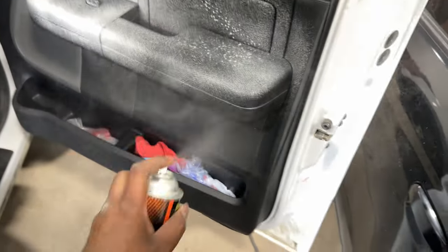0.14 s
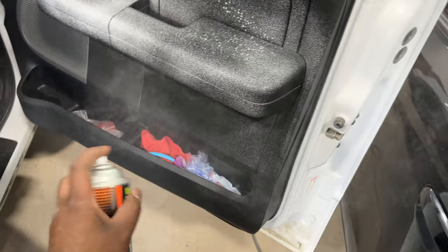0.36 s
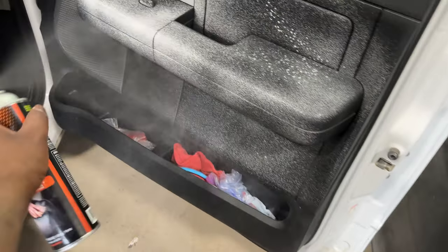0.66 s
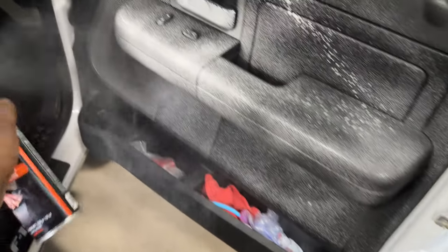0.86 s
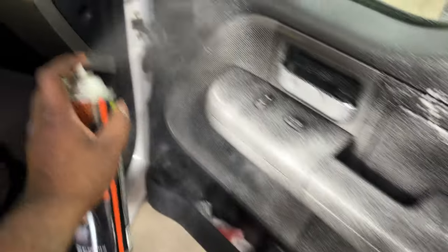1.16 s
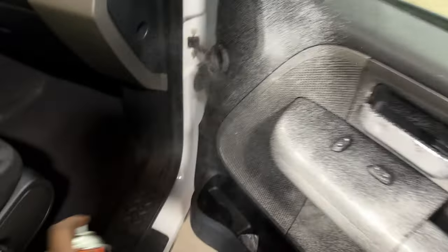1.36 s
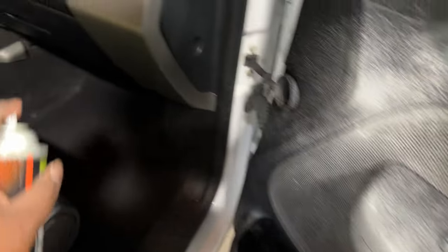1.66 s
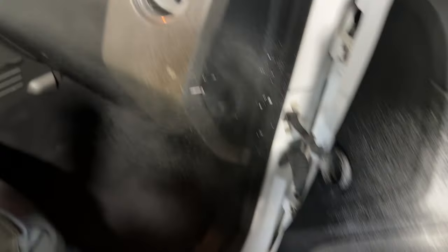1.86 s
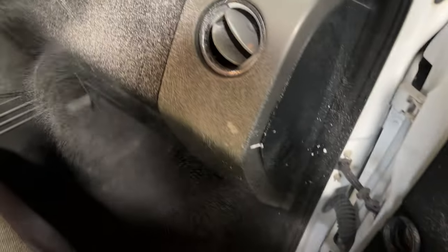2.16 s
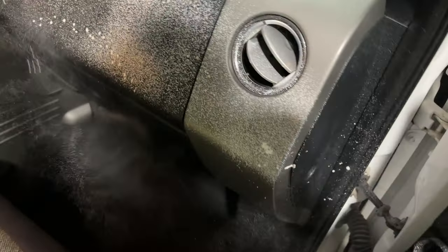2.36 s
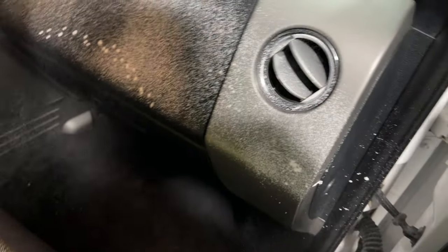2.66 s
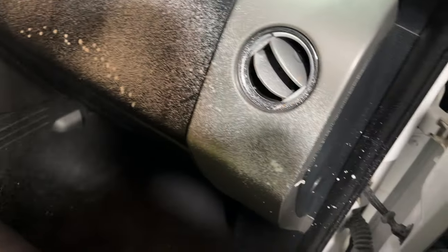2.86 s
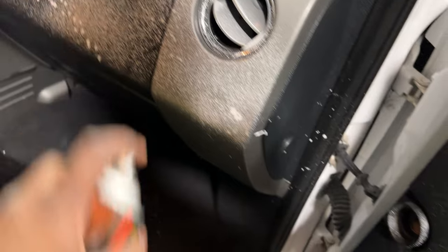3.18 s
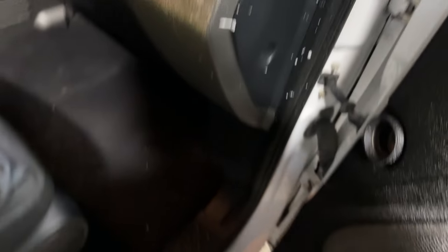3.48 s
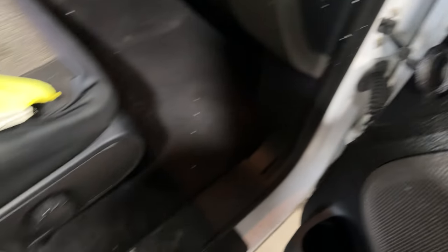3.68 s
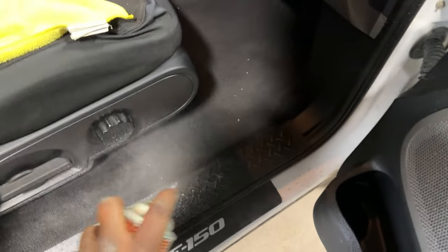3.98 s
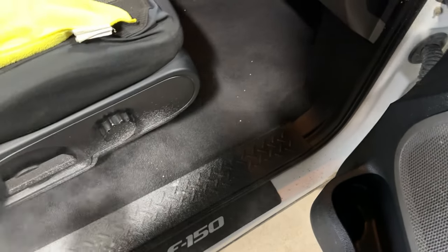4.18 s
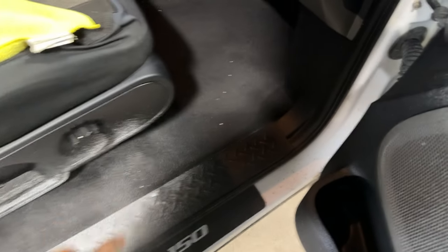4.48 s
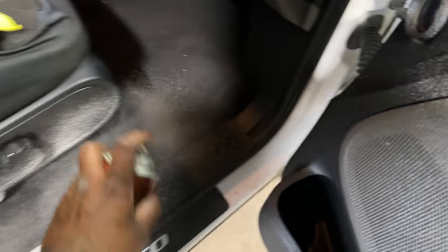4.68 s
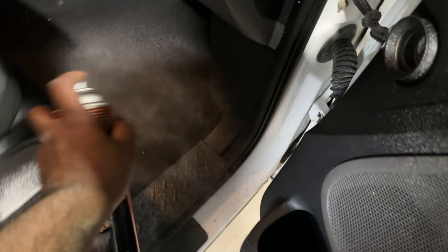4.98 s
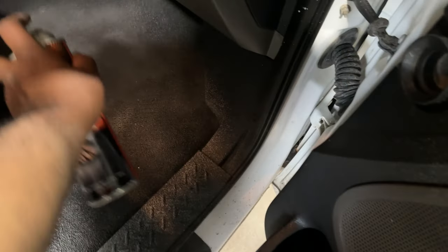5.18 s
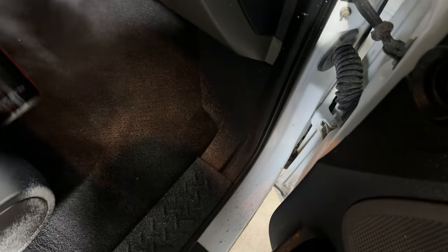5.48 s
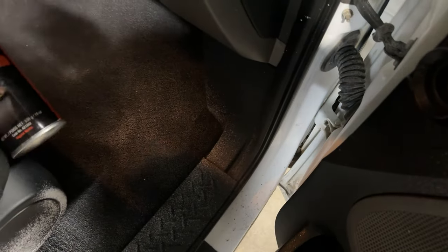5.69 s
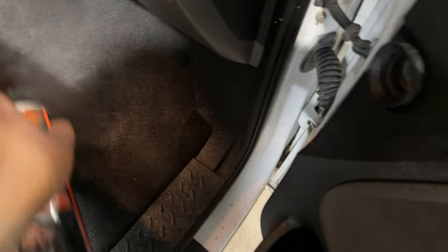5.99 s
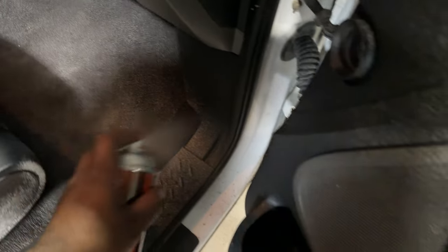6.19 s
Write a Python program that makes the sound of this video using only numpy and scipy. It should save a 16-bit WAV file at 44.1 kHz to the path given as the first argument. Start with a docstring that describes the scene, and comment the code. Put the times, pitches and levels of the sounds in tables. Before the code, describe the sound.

An aerosol can sprays foam over a vehicle's door, dash and carpet in several short, bright hisses, then one long continuous press. Brief coarser roars flare between bursts, with spits, leaks and fizz around the valve. Soft bumps and low rumble come from the hand-held microphone, very close. Late in the long spray, something hard knocks the trim with a boomy thud and small clatter. The quiet garage adds only a faint tail.

```python
"""Hissing bursts of foam cleaner open the scene amid soft bumps of a hand-held camera, close to a truck's cab.
The jet is banded turbulent noise, gated by each press; it roars briefly at edges, spits, leaks and fizzes.
Bending-wave pulses make the bumps; lumpy low noise makes the hand's rumble under them.
One hard knock rings the cab's modes with a thud and a clatter during the last long press.
The garage answers faintly with a diffuse tail over still air."""
import sys
import numpy as np
from scipy import signal
from scipy.fft import rfft, irfft, next_fast_len
from scipy.io import wavfile
from scipy.ndimage import uniform_filter1d

SR = 44100
rng = np.random.default_rng(int(sys.argv[2]) if len(sys.argv) > 2 else 0)


def inscribe(sig):
    """Save sig as 16-bit PCM at rate SR to the path in sys.argv[1].

    A 1-D sig is mono; a 2-D sig holds one channel per row.
    Samples are clipped to [-1, 1] before scaling.
    """
    pcm = np.round(np.clip(np.atleast_2d(sig).T, -1, 1) * 32767)
    wavfile.write(sys.argv[1], SR, pcm.astype(np.int16))


N = 279594
TIME, BINS = np.arange(N) / SR, np.fft.rfftfreq(N, 1 / SR)  # seconds, Hz


def gain_of(db):
    """Decibels to amplitude gain."""
    return 10 ** (np.asarray(db) / 20)


def evened(x):
    """Scales a signal to rms 1."""
    return x / np.sqrt(np.mean(x ** 2) + 1e-20)


def read(points, hz):
    """Reads a table over frequency, joined on a log axis."""
    f, value = np.transpose(points)
    return np.interp(np.log(hz + 1), np.log(f + 1), value)


def follow(table, before=None):
    """Turns a timed table's columns into curves; before the first row they hold it or take a given value."""
    s, *columns = np.transpose(table)
    return [np.interp(TIME, s, column, left=before) for column in columns]


def balance(left_db):
    """Stereo gains that set the left side above the right by left_db."""
    return gain_of(left_db * np.array([[.5], [-.5]]))


# how alike the two microphone ports hear: [pitch_hz, likeness 0-1]
PORT_LIKENESS = [(100, .9), (700, .5), (7200, .35), (10200, .75), (10600, 1), (12100, 1), (12700, .75),
                 (14200, .98)]


def paired(x):
    """Blends two unrelated signals until they are as alike as the two ports hear them."""
    a, b = rfft(x)
    same = np.clip(read(PORT_LIKENESS, BINS), 0, 1)
    return irfft(np.array([a, same * a + np.sqrt(1 - same ** 2) * b]), N)


def ports(x, lead_rad):
    """Makes the left port lead the right one by a phase."""
    left, right = rfft(x)
    return irfft(np.array([left, right * np.exp(-1j * lead_rad)]), N)


def coloured(x, db):
    """Filters a sound by a level for each frequency."""
    return irfft(rfft(x) * gain_of(db), N)


def split(x, hz, order=10):
    """Parts a sound below and above a frequency."""
    size = next_fast_len(N, real=True)
    bins = np.fft.rfftfreq(size, 1 / SR)
    low = irfft(rfft(x, size) / (1 + (bins / hz) ** order), size)[:, :N]
    return low, x - low


def resonate(x, hz, width_hz):
    """A moving resonance of gain 1: shifts the curve hz down to zero, smooths, and shifts back."""
    turn = np.exp(2j * np.pi * np.cumsum(hz) / SR)
    r = np.exp(-np.pi * width_hz / SR)
    return 2 * (turn * signal.lfilter([1 - r], [1, -r], x / turn)).real


def noise(spectrum):
    """Steady stereo noise of rms 1 with the given spectrum."""
    return evened(coloured(paired(rng.standard_normal((2, N))), read(spectrum, BINS)))


def wander(hz):
    """Slow chance of rms 1, up to about the given rate."""
    size = 8192
    rates = np.fft.rfftfreq(size, TIME[-1] / size)
    slow = irfft(rfft(rng.standard_normal(size)) / (1 + (rates / hz) ** 4), size)
    return evened(np.interp(TIME, np.linspace(0, TIME[-1], size), slow))


def patches(shape, frames=12, bins=9):
    """Smooth chance of rms 1 over frequency and time: eddies a few hundred Hz wide."""
    z = rng.standard_normal(shape)
    for _ in range(2):
        z = uniform_filter1d(uniform_filter1d(z, bins, axis=0), frames, axis=1)
    return evened(z)


def gate(start, end, rise, fall):
    """An envelope that ramps up in a straight line, holds, and decays exponentially from its end (s)."""
    level = np.zeros(N)
    span = slice(*np.searchsorted(TIME, [start, end + 20 * fall]))
    t = TIME[span]
    level[span] = np.clip((t - start) / rise, 0, 1) * np.exp(-np.maximum(t - end, 0) / fall)
    return level


# the still air of the garage: [pitch_hz, density_db per Hz]
AIR_SPECTRUM = [(80, 0), (200, -25), (550, -4), (1000, -9), (4000, -16.5), (9000, -19.5), (12000, -38)]


def still_air(level_db=-65.5):
    """The quiet garage as steady coloured noise."""
    return gain_of(level_db) * noise(AIR_SPECTRUM)


# how long the garage rings: [pitch_hz, t60_s]
GARAGE_DECAY = [(1500, 0.3), (4000, 0.77), (15000, 0.17)]


def garage(x, level_db=-14.0):
    """The garage's diffuse tail: decaying noise, each band dying at its own speed."""
    hz, t, z = signal.stft(rng.standard_normal((2, SR)), SR, nperseg=256)
    decay = np.exp(-np.log(1000) * t / read(GARAGE_DECAY, hz)[:, None])
    tail = signal.istft(z * decay, SR, nperseg=256)[1]
    wet = signal.fftconvolve(x[:1], tail / np.linalg.norm(tail[0]), axes=1)[:, :N]
    colour = [(200, 6.5), (1500, 4.0), (4000, -21.5), (9000, -7.5), (13000, -1)]  # Hz, dB
    return gain_of(level_db) * coloured(paired(wet), read(colour, BINS))


# swings of the camera arm: [start_s, end_s, level_db before the lumps]
ARM_SWINGS = [(0, 0.15, -48), (1.283, 1.665, -53), (1.666, 2.06, -53), (2.251, 2.442, -49),
              (3.795, 4.06, -55.5), (5.13, 5.416, -45.5), (5.518, 6.3, -50)]
# the hand's rumble: [pitch_hz, density_db per Hz]
RUMBLE_SPECTRUM = [(25, -7), (52, -1), (76, 2), (110, -9.5), (150, -17.5), (260, -17.5), (1000, -56.5)]


def rumble(left_db=-1.5, lumps_db=3.0, lumps_hz=12, resting_db=-60.5, rise_s=0.016, fall_s=.13, lead_rad=-1):
    """The hand rumbles on the camera in lumps, more with each swing; the flexing casing reaches right first."""
    swings = sum(gain_of(db) * gate(start, end, rise_s, fall_s) for start, end, db in ARM_SWINGS)
    grip = np.maximum(swings, gain_of(resting_db))
    lumps = evened(gain_of(lumps_db * wander(lumps_hz)))
    return ports(grip * lumps * noise(RUMBLE_SPECTRUM), lead_rad) * balance(left_db)


def thump(s, db, bright_hz, lag_cycles, thin, size=8192):
    """A blow as a bending wave: a pulse whose bass arrives later; thin (share of brightness) cuts its bass."""
    hz = np.fft.rfftfreq(size, 1 / SR) + 10
    bass_cut = (hz / np.hypot(hz, thin * bright_hz)) ** 2
    level = bass_cut / np.sqrt(1 + (hz / bright_hz) ** 8)
    late_bass = np.exp(-2j * np.pi * lag_cycles * np.log(hz))  # delay is lag_cycles / hz
    pulse = np.roll(irfft(level * late_bass, size), size // 2)
    when = s + (np.arange(size) - size / 2) / SR
    return gain_of(db) * np.interp(TIME, when, pulse / abs(pulse).max(), left=0, right=0)


# the hand taps and bumps the casing: [start_s, level_db before rattle and balance, brightness_hz]
CASING_BUMPS = [(0.039, -41.5, 810), (0.0421, -34.5, 477), (.058, -37, 520), (.08, -42, 850),
                (.096, -41, 750), (.109, -35, 600), (0.1397, -30.5, 910), (0.227, -44.5, 560),
                (0.233, -34, 580), (.402, -44.5, 630), (2.4567, -36, 1450), (2.486, -28.5, 880),
                (2.4907, -25, 320), (2.519, -32.5, 414), (2.525, -43, 546), (3.484, -46, 650),
                (3.488, -38, 325), (3.503, -38.5, 540), (3.827, -38, 263), (3.853, -36, 147),
                (3.978, -38, 450), (4.108, -42, 720)]


def bumps(left_db=4, rattle_db=-13, rattle_s=.011, lead_rad=-2.05):
    """Each bump flexes the casing, pushing the two ports out of step, and leaves a brief noisy rattle."""
    x = sum(thump(*row, lag_cycles=1.2, thin=0.037) for row in CASING_BUMPS)
    t = TIME[:SR // 10]
    tail = rng.standard_normal((2, len(t))) * np.exp(-t / rattle_s)
    rattle = signal.oaconvolve(x[None], tail / np.linalg.norm(tail[0]), axes=1)[:, :N]
    return ports(x + gain_of(rattle_db) * rattle, lead_rad) * balance(left_db)


def strike(s, db, bright_hz, modes, lag_cycles):
    """A blow rings modes near its brightness; slow bending waves bring the bass later."""
    hz, mode_db, t60 = np.transpose(modes)[:, :, None]
    span = slice(int(s * SR), int(s * SR) + SR // 2)
    t = np.maximum(TIME[span] - s - lag_cycles / hz, 0)
    treble_loss = np.sqrt(1 + (hz / bright_hz) ** 6)
    bass_loss = np.minimum(hz / bright_hz, 1) ** 1.87
    weight = gain_of(mode_db) / treble_loss * bass_loss
    rings = weight * np.sin(2 * np.pi * hz * t) * np.exp(-np.log(1000) * t / t60)
    # each port hears its own share of every mode
    shares = 1 + .06 * np.outer([1, -1], rng.standard_normal(len(hz)))
    out = np.zeros((2, N))
    out[:, span] = shares @ rings
    return gain_of(db) * out / np.linalg.norm(weight)


# contacts of the hard knock: [start_s, boom_db before the boom trim, brightness_hz, clatter_db]
KNOCK_CONTACTS = [(5.4418, -19.5, 520, -24.5), (5.446, -35, 424, -36), (5.4542, -19, 190, -30),
                  (5.539, -38, 95, -62)]
# modes of the cab's floor and trim: [pitch_hz, level_db, t60_s]
CAB_MODES = [(72.4, 4.5, 0.25), (128, 11, 0.13), (161.3, 3.5, 0.19), (182, 1, 0.25), (237, 12.5, 0.074),
             (457, 13, 0.055), (544, 17, 0.033), (650, 8, 0.065)]
# the knock's clatter: [pitch_hz, density_db per Hz]
CLATTER_SPECTRUM = [(60, -6), (300, 7), (800, -10), (1400, -3.5), (3100, -2), (4200, -7.5), (5600, -13.5),
                    (15500, -24)]


def knock(decay_s=0.013, boom_db=1, thud_db=-16.5, thud_hz=620):
    """Something hard lands on the trim with a solid thud and rattles to rest; the cab's modes boom."""
    boom = sum(strike(s, db, hz, CAB_MODES, lag_cycles=0.092) for s, db, hz, _ in KNOCK_CONTACTS)
    clatter = sum(gain_of(db) * gate(s, s, 0.0012, decay_s) for s, _, _, db in KNOCK_CONTACTS)
    thud = thump(KNOCK_CONTACTS[0][0], thud_db, thud_hz, lag_cycles=.8, thin=.8)
    return gain_of(boom_db) * boom + thud + clatter * noise(CLATTER_SPECTRUM)


# the nozzle clicks and spits: [start_s, level_db, ring_hz, decay_s]
NOZZLE_SPITS = [(1.41, -48, 3060, 0.008), (1.754, -41, 12700, 0.0041), (2.545, -49.5, 2750, 0.026),
                (3.104, -61, 3470, 0.0027), (3.2017, -37, 4300, 0.0022), (3.211, -59, 4000, 0.0094),
                (3.226, -52, 4050, 0.0039), (3.314, -58.5, 2880, 0.019), (3.349, -59.5, 2980, 0.032)]


def spits(width_hz=700, crack_db=-5):
    """The nozzle spits a sharp puff of noise, with a brief resonant ring of the plastic cap."""
    puff = noise([(300, -11), (3000, -4), (9000, 10.5), (15000, 13)])  # Hz, dB per Hz
    out = np.zeros((2, N))
    for s, db, hz, decay in NOZZLE_SPITS:
        ring = signal.lfilter(*signal.iirpeak(hz, hz / width_hz, SR), puff)
        out += gain_of(db) * gate(s, s, 0.000054, decay) * (evened(ring) + gain_of(crack_db) * puff)
    return out


def glancing(x, echo, patchy_db, sway=.015, count=7):
    """Nearby panels add weak echoes that come and go with the can, apart at each port; eddies shift colour."""
    hz, t, z = signal.stft(x, SR, nperseg=1024, noverlap=768)
    comb = np.ones(z.shape, complex)
    for port in comb:
        delays_s = np.geomspace(.0014, .01, count) * rng.uniform(.8, 1.2, count)
        for delay in delays_s:
            drift, strength = (np.interp(t, TIME, wander(rate_hz)) for rate_hz in (1, 4))
            moving_delay = delay * (1 + sway * drift)
            port += echo * strength * np.exp(-2j * np.pi * hz[:, None] * moving_delay)
    comb /= np.sqrt(np.mean(abs(comb) ** 2, axis=1, keepdims=True))
    comb *= gain_of(patchy_db * patches(z.shape[1:]))
    return signal.istft(z * comb, SR, nperseg=1024, noverlap=768)[1][:, :N]


# the can's side of the stereo image: [pitch_hz, left_minus_right_db]
CAN_SIDE = [(600, 2), (2500, -.5), (3600, 2), (5000, 5.5), (6400, 6.5), (7900, 0)]


def spray_noise(spectrum, echo, flutter_db, patchy_db):
    """Turbulent noise from the can's side, fluttering as foam and gas alternate in the nozzle."""
    x = paired(glancing(rng.standard_normal((2, N)), echo, patchy_db))
    side_db = read(CAN_SIDE, BINS) * np.array([[.5], [-.5]])
    x = coloured(x, read(spectrum, BINS) + side_db)
    return evened(x) * gain_of(flutter_db * wander(210))


# presses of the valve, the last one long: [open_s, close_s, level_db before the band trims,
# splash_db re hiss and wash_db re hiss (both before the trims), seep_s before opening,
# seep_db re level_db, seep_brightness_hz, dribble_decay_s]
VALVE_PRESSES = [(0, 0.311, -53, -3.5, -9.5, 0.086, 10.5, 4000, 0.027),
                 (0.448, 0.925, -52, -5.5, -15, 0.0075, -4, 6000, 0.0025),
                 (1.089, 1.223, -48.5, -7, -11.5, 0.022, -6, 5000, 0.063),
                 (1.749, 2.031, -47.5, -6, -10, 0.034, -4.5, 5050, 0.038),
                 (2.23, 2.431, -50, -2.5, -11, 0.14, 0.5, 8000, 0.038),
                 (2.621, 2.751, -48, -5, -14.5, 0.14, -8, 7200, 0.0044),
                 (2.886, 3.019, -49, -5.5, -11.5, 0.067, 0, 2240, 0.0081),
                 (3.485, 6.4, -51, -9, -7.5, 0.19, -6.5, 7300, 0.0091)]


def leaks(dribble_rise=0.013, fall=0.0019, sputter_db=3.0, sputter_hz=30, top_db=-11, build=1.0,
          dribble_db=-1, foam_db=-16, foam_decay=0.093):
    """Foam seeps through the narrow crack before a press, then dribbles and fizzes on; chance sputters it."""
    spectrum = [(300, -5.5), (1000, -4.5), (1800, -1), (2900, -5.5),
                (9000, -10.5), (12000, -17), (15500, -17)]  # Hz, dB per Hz
    x = spray_noise(spectrum, echo=.16, flutter_db=2, patchy_db=.6)
    foam = split(x, 2800)[0]
    out = np.zeros((2, N))
    for start, end, db, _, _, seep, seep_db, bright_hz, dribble in VALVE_PRESSES:
        low, top = split(x, bright_hz)
        crack = low + gain_of(top_db) * top  # duller above its brightness
        out += gain_of(db + seep_db) * gate(start - seep, start, build * seep, fall) * crack
        # the half-open valve, then foam fizzing on the surface
        out += gain_of(db + dribble_db) * gate(end, end, dribble_rise, dribble) * x
        out += gain_of(db + foam_db) * gate(end, end, dribble_rise, foam_decay) * foam
    return out * gain_of(sputter_db * wander(sputter_hz))


# the jet strikes an edge or hollow: [start_s, end_s, level_db, rise_s, fall_s,
# tilt_db per octave, hollow_hz, hollow_lift_db, standing_wave_share 0-1]
EDGE_ROARS = [(1.6, 1.678, -36, 0.0063, 0.035, 1, 1390, 6, 0.96),
              (2.095, 2.143, -37.5, 0.015, 0.027, -0.1, 950, 1, 0.13),
              (3.881, 3.951, -38.5, 0.04, 0.023, -2, 875, 5, 0.17)]
# the roar: [pitch_hz, density_db per Hz]
ROAR_SPECTRUM = [(250, -6.5), (600, -2), (820, 0), (1100, 1.5), (2100, 0.5), (3300, 0.5), (5500, -5.5),
                 (8500, -6), (11500, -13.5), (15500, -16)]
# standing waves behind the door's edge: [pitch_hz, lift_db at full share]
HOLLOW_WAVES = [(630, 11), (1075, -1), (1145, 9), (1380, 11), (1668, 8), (1744, 2), (2585, 15), (3350, 12)]


def roars(hollow_octaves=0.66, wave_width_hz=24):
    """At an edge the jet turns into a short, coarse roar, coloured by the hollow behind it."""
    x = spray_noise(ROAR_SPECTRUM, echo=.24, flutter_db=1.7, patchy_db=1.5)
    waves_db = sum(db / (1 + ((BINS - hz) / wave_width_hz) ** 2) for hz, db in HOLLOW_WAVES)
    out = np.zeros((2, N))
    for start, end, db, rise, fall, tilt, hollow_hz, lift_db, share in EDGE_ROARS:
        octaves = np.log2((BINS + 1) / hollow_hz)
        tilt_db = tilt * np.maximum(octaves, -2)
        hollow_db = lift_db * np.exp(-(octaves / hollow_octaves) ** 2)
        roar = evened(coloured(x, tilt_db + hollow_db + share * waves_db))
        out += gain_of(db) * gate(start, end, rise, fall) * roar
    return out


def pressed(start, end, rise=0.0088, fall=0.0086):
    """The valve opens in a quick ramp and shuts with a short exponential tail."""
    return gate(start, end, rise, fall)


# the jet: [pitch_hz, density_db per Hz before the bands are levelled]
JET_SPECTRUM = [(150, -8.5), (550, -3), (850, -2.5), (1180, -2.5), (1450, -1.5), (2300, -12.5),
                (3200, -9.5), (5500, -4), (6500, 0.5), (7100, 2), (8000, 9), (10000, 9.5), (11600, 2.5),
                (13000, 9), (15500, 7)]
# the can moves over sill and carpet in the long press: [time_s, nearness_db, extra_splash_db]
CAN_SWEEP = [(4.1, -1, 2.5), (4.9, -3.5, 4.5), (5.18, 2, 1.5), (5.65, -2.5, 1.5), (5.95, -1.5, 2.5),
             (6.34, 0.5, 5.5)]
# two resonances between can and surface, shifting with the hand:
# [time_s, lower_hz, upper_hz, upper_db re lower]
GAP_RESONANCES = [(.02, 3100, 5230, -16), (.24, 2230, 3100, -18), (.8, 2480, 3040, 3),
                  (1.15, 4250, 6200, -14), (1.92, 2680, 5400, -3), (2.33, 3560, 5600, -3),
                  (2.68, 2230, 3900, -18), (2.95, 3000, 4200, 7.5), (3.6, 3060, 4670, -19),
                  (3.95, 2430, 5200, 1), (4.65, 2790, 4700, 10), (5.1, 2850, 5900, 6.5),
                  (5.35, 2750, 5430, 9), (5.85, 4280, 6000, 10.5), (6.16, 2090, 4500, -6)]


def jet(hiss_db=2, splash_db=2, wash_db=3.0, fizz_db=-51.5, ring=0.32, ring_width_hz=800,
        wash_follows=1.77, ring_follows=1):
    """Hiss, splash and wash come off the surface being hit; the nozzle's own fizz keeps one level."""
    near_db, extra_splash_db = follow(CAN_SWEEP, before=0)
    x = spray_noise(JET_SPECTRUM, echo=.28, flutter_db=.5, patchy_db=1.1)
    # four bands, from low to top
    low, x = split(x, 2730, order=6)
    middle, x = split(x, 2470, order=8)
    high, top = split(x, 5710)
    hiss = gain_of(hiss_db) * evened(high)
    splash = gain_of(splash_db + extra_splash_db) * evened(middle)
    # wash_follows and ring_follows: extra dB per dB of nearness, beyond the hiss
    wash = gain_of(wash_db + wash_follows * near_db) * evened(low)
    surface, flow = np.zeros((2, N)), np.zeros(N)
    for start, end, db, splashy_db, washy_db, *_ in VALVE_PRESSES:
        valve = pressed(start, end)
        spray = hiss + gain_of(splashy_db) * splash + gain_of(washy_db) * wash
        surface += valve * gain_of(db) * spray
        flow += valve
    # the gap between can and surface favours two standing waves
    lower_hz, upper_hz, upper_db = follow(GAP_RESONANCES)
    standing = resonate(surface, lower_hz, ring_width_hz)
    standing = standing + gain_of(upper_db) * resonate(surface, upper_hz, ring_width_hz)
    share = ring * gain_of(ring_follows * near_db)
    struck = gain_of(near_db) * (surface + share * standing) / (1 + share / 2)
    return struck + gain_of(fizz_db) * flow * evened(top)


# how far the left port leads for airborne sound: [pitch_hz, lead_rad]
AIRBORNE_LEAD = [(120, .2), (400, 1.1), (700, 1.7), (1100, 4.4), (1500, 4.2), (2100, 6.3), (2900, 9.4),
                 (3800, 12.6), (6000, 19.3), (8300, 18.8), (9700, 17.6), (10600, 15.71), (12100, 15.71),
                 (12700, 14.4), (14000, 12.57)]


def scene():
    """Sound through the air reaches the left port first; handling comes through the casing."""
    near = jet() + roars() + leaks() + spits() + knock()
    airborne = near + garage(near) + still_air()
    return ports(airborne, read(AIRBORNE_LEAD, BINS)) + rumble() + bumps()


def record(dry, bass_cut_hz=46, edge_hz=15950):
    """A bass cut, then a steep treble limit."""
    cut = signal.sosfilt(signal.butter(4, bass_cut_hz, "highpass", fs=SR, output="sos"), dry)
    band_limit = signal.firwin(511, edge_hz, window=("kaiser", 9), fs=SR)
    return signal.oaconvolve(cut, band_limit[None], "same")


dry = scene()
out = record(dry)
inscribe(out)
```